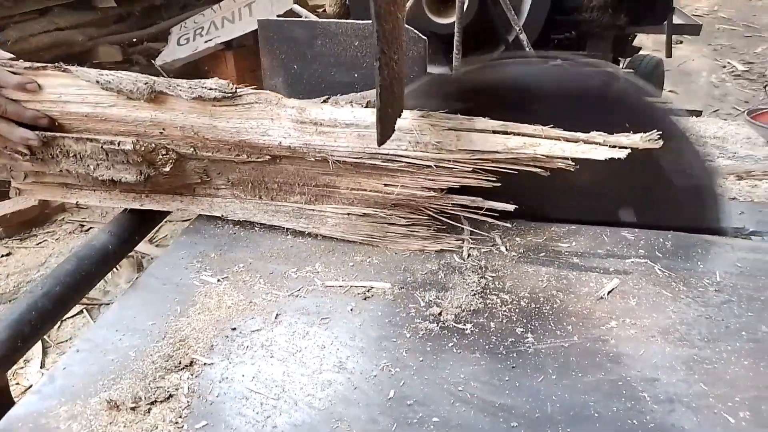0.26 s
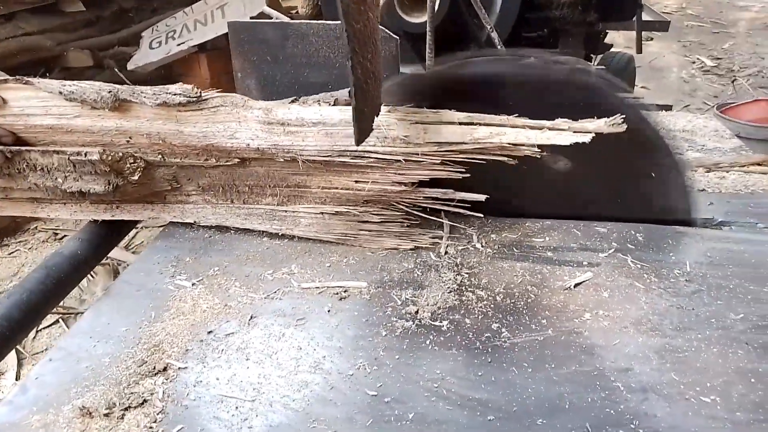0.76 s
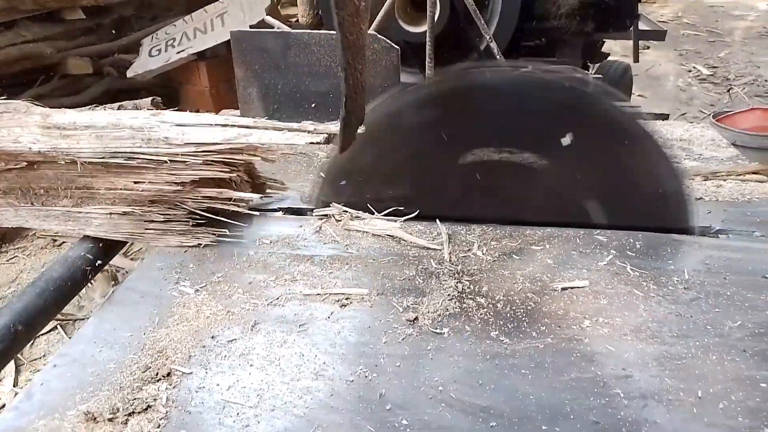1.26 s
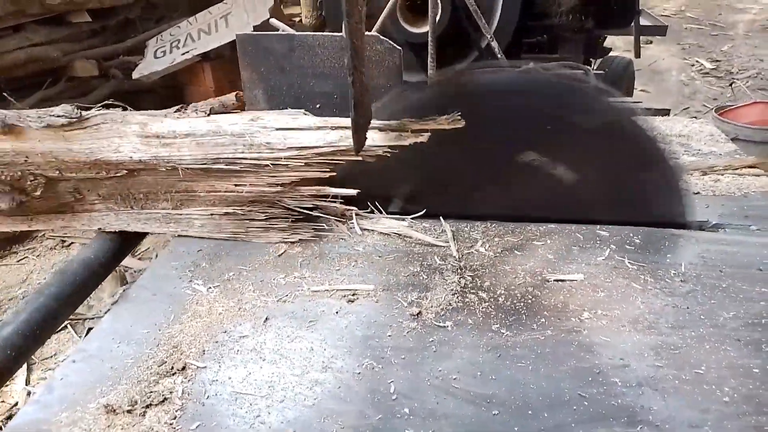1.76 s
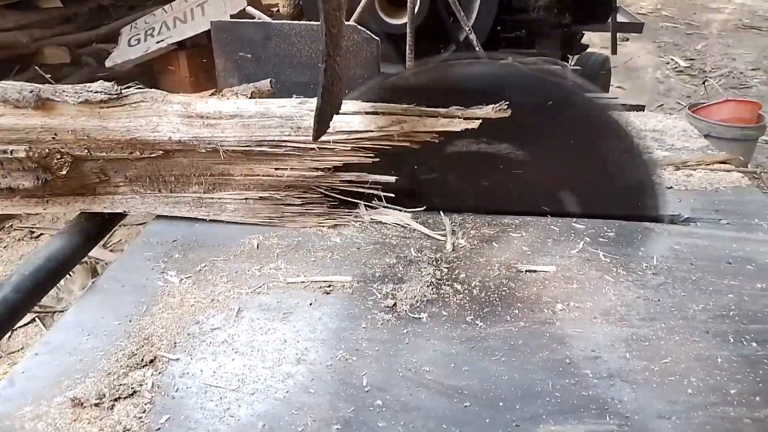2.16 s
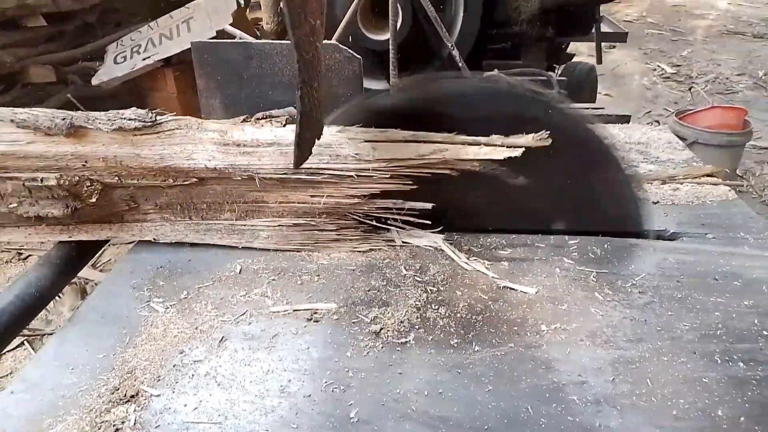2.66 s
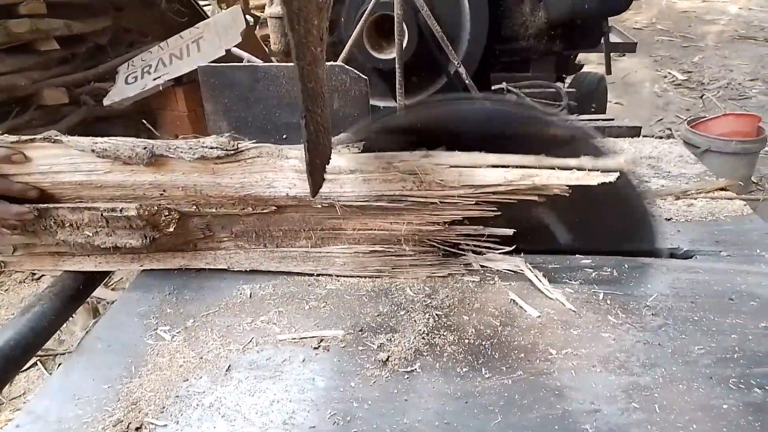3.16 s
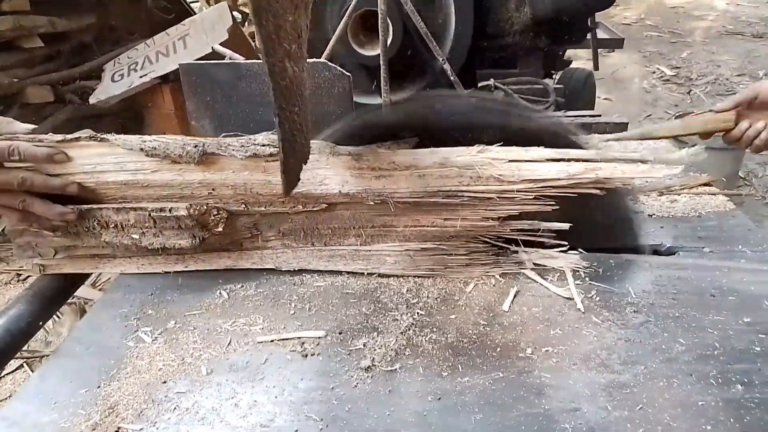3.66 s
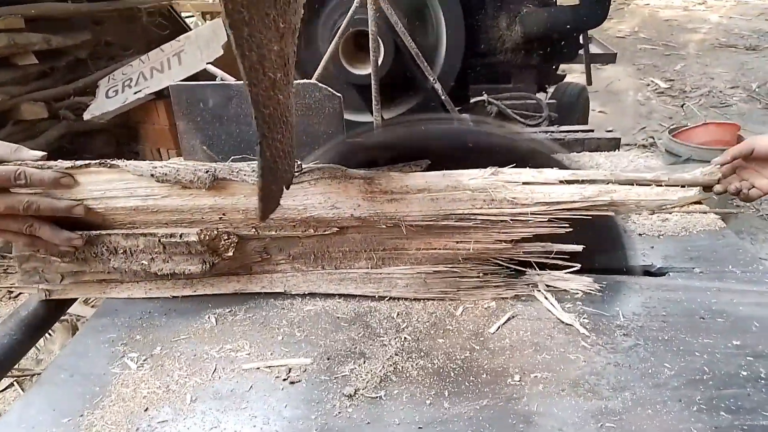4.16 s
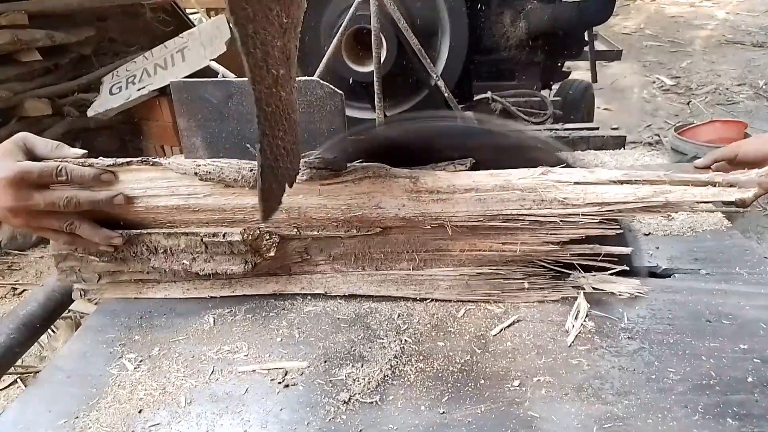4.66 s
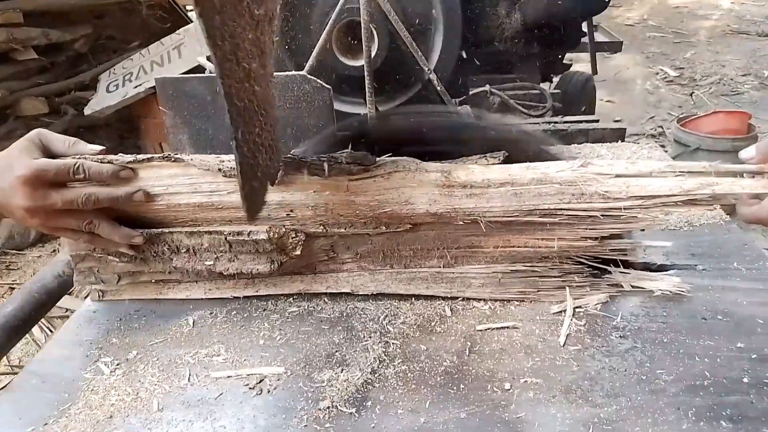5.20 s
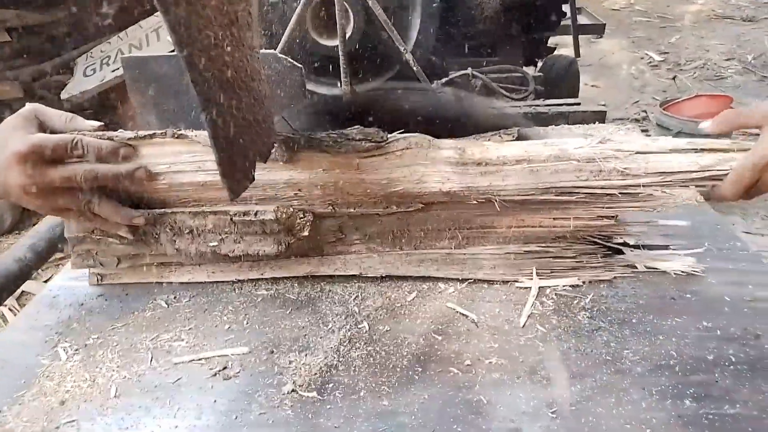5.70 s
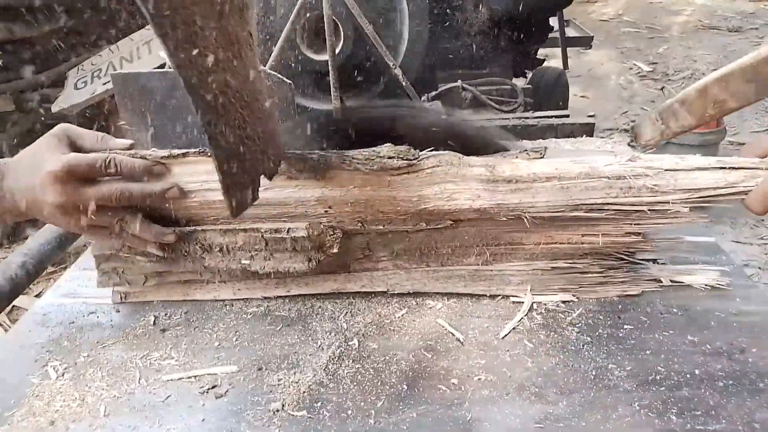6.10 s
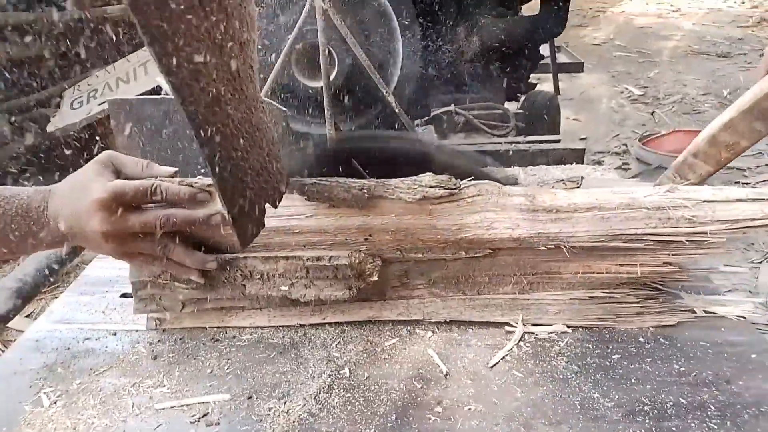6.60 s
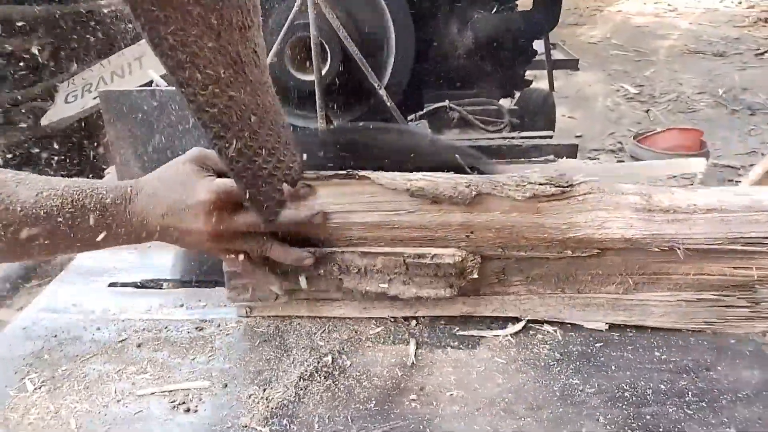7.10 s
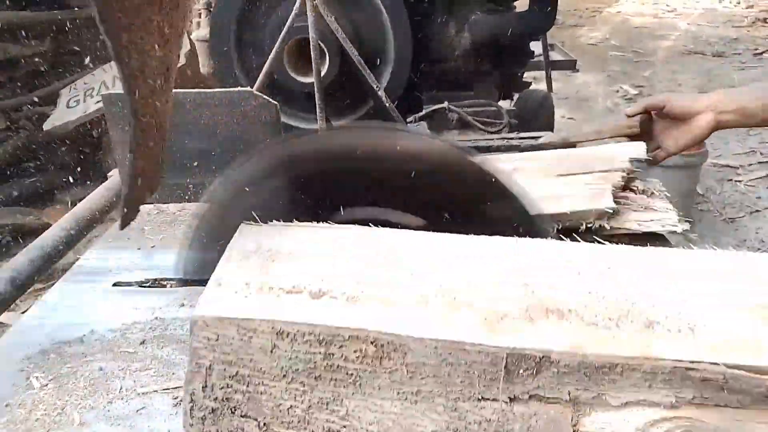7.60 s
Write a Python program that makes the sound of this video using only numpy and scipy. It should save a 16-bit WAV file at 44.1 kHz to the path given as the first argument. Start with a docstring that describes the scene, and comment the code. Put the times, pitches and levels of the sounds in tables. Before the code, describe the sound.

Outdoors and close up, a big circular saw is already biting a log with harsh hiss and whine. The log is drawn back, the blade rings over a fast thumping, clattering one-cylinder engine, then a five-second cut roars with sagging, shifting whine. It comes clear with faint ringing before the teeth bite again. Dry, loud and slightly overloaded stereo pickup.

```python
"""Outdoors, a one-cylinder engine drives a large circular saw that is already biting a log: teeth hiss and whine.
At about 0.6 s the log is drawn back, and the blade rings on over the engine's thump and clatter, once a cycle.
From 1.3 s the log is fed in again for a five-second cut: noise pulsed by the teeth, whine on the tooth rate.
It comes clear at about 6.5 s with brief tones and fainter ringing, then the teeth bite again from 7.5 s to the end.
The frame rattles and roars throughout, and a gain control pulls the engine down when the teeth bite loudly."""
import sys
import numpy as np
from scipy import signal
from scipy.fft import rfft, irfft, next_fast_len
from scipy.io import wavfile
from scipy.ndimage import uniform_filter1d

SR = 44100
rng = np.random.default_rng(int(sys.argv[2]) if len(sys.argv) > 2 else 0)


def generate_wav(sig):
    """Save sig (samples, or channels by samples) to the path in sys.argv[1] as 16-bit PCM at SR."""
    pcm = np.round(np.clip(np.atleast_2d(sig).T, -1, 1) * 32767).astype(np.int16)
    wavfile.write(sys.argv[1], SR, pcm)


N = 346185
GRIP_DB = -2.5  # wood on the teeth damps the steel
BITE_S, CLEAR_S = 0.052, 0.11  # time for the teeth to bite in and to come clear


def gain_of(db):
    """Decibels to gain."""
    return 10 ** (np.asarray(db) / 20)


def evened(x):
    """Scales to rms 1."""
    return x / np.sqrt(np.mean(x ** 2) + 1e-20)


def read(points, hz):
    """Spectrum columns at hz, joined on a log frequency axis."""
    point_hz, *columns = np.transpose(points)
    return np.array([np.interp(np.log(hz + 1), np.log(point_hz + 1), column) for column in columns])


def curves(rows):
    """Each column of a time table at every sample."""
    time_s, *columns = np.transpose(rows)
    return [np.interp(np.arange(N) / SR, time_s, column) for column in columns]


def wander(rate_hz):
    """Slow chance of rms 1: low-passed noise drawn at a thirty-second of the sample rate."""
    b, a = signal.butter(2, rate_hz, fs=SR / 32)
    count = N // 32 + 2
    slow = signal.lfilter(b, a, rng.standard_normal(count))
    return evened(np.interp(np.arange(N) / 32, np.arange(count), slow))


# how alike the noise is on the two sides: freq_hz [Hz], likeness [0-1]
LIKENESS = [(60, 1), (280, 0.637), (620, 0.41), (1350, 0.087), (2950, 0), (14000, 0)]


def noise(spectrum, patchy_db):
    """Two-channel noise of a given colour whose time-frequency patches drift in level."""
    hz = np.fft.rfftfreq(512, 1 / SR)
    a, b, c, d, patches = rng.standard_normal((N // 128 + 5, 257, 5)).T
    patches = uniform_filter1d(patches, size=6, axis=0)  # across frequency
    patches = evened(uniform_filter1d(patches, size=20, axis=1))  # across time
    same = np.clip(read(LIKENESS, hz).T, -1, 1)
    left = a + 1j * b
    right = same * left + np.sqrt(1 - same ** 2) * (c + 1j * d)
    bins = np.array([left, right]) * gain_of(read(spectrum, hz).T + patchy_db * patches)
    return evened(signal.istft(bins, nperseg=512, noverlap=384)[1][:, :N])


def whistle(hz, width_hz, steady=0.):
    """Noise through two equal narrow resonances at a moving pitch, with a steady core if asked; rms 1."""
    r = np.exp(-np.pi * width_hz / SR)
    slow = rng.standard_normal(N) + 1j * rng.standard_normal(N)
    for _ in range(2):
        slow = signal.lfilter([1 - r], [1, -r], slow)
    slow = steady + slow / np.std(slow)
    carrier = np.exp(2j * np.pi * np.cumsum(hz * np.ones(N)) / SR)
    return evened((slow * carrier).real)


def swell(start_s, end_s, level_db):
    """A rounded rise and fall of gain."""
    along = np.clip((np.arange(N) / SR - start_s) / (end_s - start_s), 0, 1)
    return gain_of(level_db) * np.sqrt(np.sin(np.pi * along).clip(0))


# the log against the teeth: bite_s [s], clear_s when they begin to come clear [s]
CUTS = [(-1, .55), (1.318, 6.43), (7.48, 8.2)]


def contact(rise_s):
    """0-1: how far the teeth are in the wood, reached over rise_s and left over CLEAR_S."""
    t = np.arange(N) / SR
    total = np.zeros(N)
    for bite_s, clear_s in CUTS:
        total += np.clip(np.minimum((t - bite_s) / rise_s, 1 - (t - clear_s) / CLEAR_S), 0, 1)
    return total


# engine speed: time_s [s], speed [cycles a second]
ENGINE_SPEED = [(0, 12.75), (.25, 12.61), (.45, 12.97), (.7, 13.23), (1, 13.665), (1.4, 13.79),
                (1.8, 13.515), (2.2, 13.27), (2.7, 12.95), (3.2, 12.807), (3.5, 13.104), (3.8, 13.263),
                (4.3, 13.141), (4.9, 13.031), (5.5, 12.913), (5.9, 12.88), (6.2, 12.862), (6.55, 13.301),
                (6.9, 13.768), (7.2, 13.81), (7.5, 13.847), (7.85, 13.675)]


def crank():
    """Engine cycles gone by at every sample: the running sum of the speed."""
    start_turn = -.09  # cycles
    return start_turn + np.cumsum(curves(ENGINE_SPEED)[0]) / SR


def once_a_cycle(turns, place, spread_db, jitter):
    """One click each time the crank passes a place, uneven in size and, by jitter in cycles, in time."""
    chance = rng.standard_normal((120, 2))
    cycle = np.arange(120) - 1 + place
    # passes outside the scene land on the spare last sample, which is dropped
    at = np.interp(cycle + jitter * chance[:, 0], turns, np.arange(N), left=N, right=N).astype(int)
    clicks = np.zeros(N + 1)
    clicks[at] = gain_of(spread_db * chance[:, 1])
    return clicks[:N]


def ring(hz, t60_s):
    """A decaying mode whose drive builds softly over about one of its cycles."""
    t = np.arange(4000) / SR
    build = (1 - np.exp(-t * hz * .9)) ** 2
    return 2.6 * gain_of(-60 * t / t60_s) * build * np.sin(2 * np.pi * hz * t)


# tooth passing rate, sagging under load, before a slight wander: time_s [s], rate_hz [Hz]
TOOTH_RATE = [(0, 925), (.45, 941), (1.36, 1018), (1.62, 988), (2, 949), (2.45, 928), (2.95, 872.3),
              (3.5, 952), (4.9, 917), (5.1, 887), (5.25, 869.3), (5.75, 876), (6, 905.6), (6.5, 948),
              (7.85, 940)]
# how hard the log is pushed, as the level of the tearing: time_s [s], level_db [dB]
PUSH = [(.2, -9), (.5, -9.5), (1.45, -6.5), (2.1, -3), (2.6, -4.5), (3, -4), (3.25, -5.5), (3.5, -8.5),
        (3.8, -4.5), (4.8, -7.5), (5.05, -6.5), (5.3, -4), (5.55, -6.5), (6.4, -8), (7.55, -6.5),
        (7.85, -3.5)]
# brief shifts in the tearing, mostly dips as the teeth lose their grip: time_s [s], change_db [dB]
SLIPS = [(0, -3.5), (.065, -8.5), (.15, -7.5), (4.13, 1), (4.38, 0.5), (5.65, -0.5), (5.9, -2.5)]
# colour of the tearing: freq_hz [Hz], density_db [dB per Hz, relative]
HISS = [(400, -51), (1500, -14.5), (2500, -4), (4000, -2), (9000, 4.5), (14500, 0)]
# steady whine while cutting, before flutter: multiple of the tooth rate -> level_db [dB]
WHINE_DB = {"1st": -36.5, "2nd": -38, "7th": -40}
# swells of the whine, before flutter: multiple of the tooth rate, start_s [s], end_s [s], level_db [dB]
SWELLS = [("1st", .05, 0.72, -28.5), ("1st", 1.34, 1.78, -18), ("1st", 1.68, 2.13, -18.5),
          ("1st", 2.1, 2.58, -27), ("1st", 2.77, 5.3, -29), ("1st", 5, 5.66, -28.5),
          ("1st", 5.8, 6.47, -29.5), ("2nd", 2.16, 2.74, -20), ("2nd", 2.76, 3.8, -23.5),
          ("2nd", 4.75, 5.08, -25.5), ("2nd", 5.14, 5.6, -27), ("7th", 1.4, 2.6, -39),
          ("7th", 3.14, 4.06, -23.5), ("7th", 4.9, 5.35, -19.5), ("7th", 4.98, 6.47, -27)]
# engine effort: time_s [s], running_free [0-1], knock_db strength [dB]
EFFORT = [(0, 0, 7.5), (.55, 0.1, 8), (1.35, 0.73, 0.5), (2, 0, 7), (4, .05, 0), (6.55, 0.03, 1.5),
          (6.75, 1, 5.5), (7.5, .9, -6), (7.85, 0, -2)]


def cutting():
    """Each tooth tears a chip of its own size: noise pulsed at the tooth rate, with a whine on its multiples."""
    slip_width_s, idle_hiss_db, spun_up_hiss_db = 0.023, -31, -27
    t = np.arange(N) / SR
    rate_hz = curves(TOOTH_RATE)[0] * (1 + .003 * wander(7.94))
    cut = contact(BITE_S)
    tear_db = curves(PUSH)[0]
    for time_s, change_db in SLIPS:
        tear_db = tear_db + change_db * np.exp(-((t - time_s) / slip_width_s) ** 2)

    passed = np.cumsum(rate_hz) / SR  # teeth gone by
    chip_db = .9 * rng.standard_normal(9000)[passed.astype(int)]
    bite = gain_of(chip_db + 1.0 * wander(5.4)) * (1 + 0.0667 * np.cos(2 * np.pi * passed))
    idle_db = idle_hiss_db + curves(EFFORT)[0] * (spun_up_hiss_db - idle_hiss_db)
    hiss = gain_of(idle_db + cut * (tear_db - idle_db)) * evened(bite * noise(HISS, 1.72))

    flutter = evened(gain_of(2.3 * wander(45)))  # the blade wobbles, so the whine comes and goes
    level = {name: cut * gain_of(db) for name, db in WHINE_DB.items()}
    for name, *row in SWELLS:
        level[name] = np.hypot(level[name], swell(*row))
    whine = level["1st"] * whistle(rate_hz, 30., 2.2)
    whine += level["2nd"] * whistle(2 * rate_hz, 110., .5)
    whine += level["7th"] * whistle(7 * rate_hz, 260.)
    return hiss + flutter * whine


# blade modes: pitch_hz [Hz], width_hz of each resonance [Hz], level_db [dB, relative]
BLADE = [(558, 106, -6), (676, 35, -9), (729, 90, -5.5), (855, 49, -17), (958, 26, -5)]
# blade set ringing as the wood lets go: peak_s [s], level_db before grip [dB], fade [dB a second]
RINGING = [(.5, -22.5, 3.5), (6.58, -31, 11)]
# the log hums while it slides: start_s [s], end_s [s], level_db before grip [dB]
HUMS = [(-.4, 0.686, -22.5), (1.38, 2.1, -29), (1.992, 3.45, -24.5), (4.0, 5.1, -34)]
# brief tones, squeals and broad bursts from blade and wood: start_s, end_s [s], pitch_hz, width_hz [Hz],
# level_db before grip [dB]
BRIEF_TONES = [(0.087, 0.42, 1470, 77, -24), (.28, 0.38, 1090, 40, -16.5), (0.34, 0.74, 2250, 750, -21.5),
               (0.4, 0.86, 2130, 49, -33), (1.7, 2.34, 836, 40, -21), (6.44, 6.58, 1110, 270, -23.5),
               (5.6, 6.54, 1350, 430, -21.5), (6.2, 7.55, 1450, 210, -29), (6.65, 7.9, 525, 120, -29.5),
               (6.9, 7.6, 1850, 160, -23.5)]


def blade_and_log():
    """Fixed blade modes ring as wood lets go, brief tones and squeals swell and fade, and the sliding log hums."""
    t = np.arange(N) / SR
    ringing = np.zeros(N)
    for peak_s, level_db, fade in RINGING:
        after = t - peak_s
        ringing += gain_of(level_db + np.minimum(50 * after, -fade * after))  # rises 50 dB a second
    out = ringing * sum(gain_of(db) * whistle(hz, width, 0.68) for hz, width, db in BLADE)
    log_hz = 392.4 * (1 + 0.01285 * wander(1.35))
    out += sum(swell(*row) for row in HUMS) * whistle(log_hz, 42, 0.75)
    for start_s, end_s, hz, width_hz, level_db in BRIEF_TONES:
        out += swell(start_s, end_s, level_db) * whistle(hz, width_hz, 0.45)
    return out * gain_of(GRIP_DB * contact(BITE_S))


# exhaust and intake blows in one cycle: place [0-1], pitch_hz [Hz], t60_s [s],
# load_db under load, free_db running free [dB, relative]
BLOWS = [(0.359, 122.5, 0.048, -22.5, -21.5), (0.381, 245, 0.031, -11.5, -15.5),
         (0.688, 265, 0.025, -12, -6), (0.951, 262, 0.038, -20, -19)]
# metal knocks in one cycle: place [0-1], pitch_hz [Hz], t60_s [s], level_db before knock strength [dB]
KNOCKS = [(0.198, 690, 0.017, -13), (.2, 930, 0.0091, -17.5), (0.199, 514, 0.019, -16),
          (0.302, 598, 0.02, -24), (0.451, 745, 0.0161, -22.5), (.72, 550, 0.012, -16.5)]
# valve gear clacks in one cycle: place [0-1], load_db under load [dB, relative], t60_s [s],
# free_db running free [dB, relative]
CLACKS = [(0.165, -7.5, 0.03, -10), (.24, -17, 0.03, -12.5), (0.42, -7.5, 0.056, -15),
          (.58, -20.5, 0.047, -14), (.67, -31, 0.039, -13), (.94, -17, 0.027, -18)]
# colour of the clacks: freq_hz [Hz], density_db [dB per Hz, relative]
CLANK = [(500, -1.5), (2000, 6.5), (4000, 2), (5300, -0.5), (7500, 7), (11000, 6), (13000, 2.5),
         (14500, -49)]


def engine():
    """Blows ring low modes, knocks ring the block, clacks gate a metallic noise, one gear order sings."""
    clack_free_db, clack_cut_db = -0.96, -3.5  # added to every clack
    gear_order, gear_db = 23, -42.5  # whine cycles per engine cycle, and its middle level
    turns, t = crank(), np.arange(4000) / SR
    free, knock_db = curves(EFFORT)
    clack_db = clack_free_db + contact(BITE_S) * (clack_cut_db - clack_free_db)
    thump, gate = np.zeros(N), np.zeros(N)
    for place, hz, t60_s, load_db, free_db in BLOWS:
        blows = gain_of(load_db + free * (free_db - load_db)) * once_a_cycle(turns, place, 1.1, .0015)
        thump += signal.oaconvolve(blows, ring(hz, t60_s))[:N]
    for place, hz, t60_s, level_db in KNOCKS:
        knocks = gain_of(level_db + knock_db) * once_a_cycle(turns, place, 1.5, .002)
        thump += signal.oaconvolve(knocks, ring(hz, t60_s))[:N]
    for place, load_db, t60_s, free_db in CLACKS:
        puff = gain_of(-60 * t / t60_s) * (1 - np.exp(-t / 0.0014))
        level_db = clack_db + load_db + free * (free_db - load_db)
        clacks = gain_of(level_db) * once_a_cycle(turns, place, 2.2, .004)
        gate += signal.oaconvolve(clacks, puff)[:N]
    gear_gain = gain_of(gear_db + 2.14 * wander(5.9)) * np.sqrt(2)
    gear = gear_gain * np.sin(2 * np.pi * gear_order * turns)
    return thump + gear + gate * noise(CLANK, 1.1)


# colour of the shaken steel table: freq_hz [Hz], density_db [dB per Hz, relative]
RATTLE = [(20, -60), (40, -42), (80, -15), (120, -11), (165, -19), (200, -21.5), (260, -7), (400, 0.5),
          (600, -1.5), (850, -1), (1200, -2), (2500, -26)]
# colour of the blade and belt whirr: freq_hz [Hz], density_db [dB per Hz, relative]
ROAR = [(300, -57), (700, -13.5), (1100, -1), (1500, 1.5), (1830, 3), (2150, -3.5), (3000, -16),
        (5000, -16.5), (14000, -39)]


def frame():
    """The steel table rattles and blade and belt whirr: two noises that swell with the push and each firing."""
    cut = contact(0.5)  # the log shakes the frame fully once the blade has sunk in, after 0.5 s
    push_db = curves(PUSH)[0]

    def driven_db(idle_db, cut_db, share):
        """Level from idle to cutting, with a share of the push passed on."""
        return idle_db + cut * (cut_db + share * push_db - idle_db)

    since_firing = (crank() - .17) % 1  # in cycles
    jolt_db = 3.5 * np.exp(-since_firing / 0.19)
    shake_db = GRIP_DB * contact(BITE_S) + 0.78 * wander(31) + jolt_db
    rattle = gain_of(driven_db(-25.5, -16, 0.51) + shake_db) * noise(RATTLE, 0.67)
    whirr = gain_of(driven_db(-22, -12, 0.69) + shake_db) * noise(ROAR, 1.75)
    return rattle + whirr


def scene():
    """All sources summed, in the open air with no reverberation."""
    return cutting() + blade_and_log() + engine() + frame()


def roll_off(x):
    """The treble ends steeply here."""
    return signal.sosfilt(signal.butter(12, 14350, fs=SR, output="sos"), x)


# the two microphone ports, each with resonances of its own: freq_hz [Hz], left_db [dB], right_db [dB]
PORTS = [(25, -27, -22), (69.5, -7.5, -5.5), (123, -3.5, -4), (165, -12, -6), (238, -3, -1),
         (1930, -1.5, 1), (2630, 0, -1), (3500, 3, 3.5), (4740, 6.5, -1.5), (5170, -4, 3), (5820, 4.5, 0),
         (7485, 14, -0.5), (8320, 4, -1.5), (8680, 3.5, -0.5), (9640, -9.5, 4), (11010, 5.5, 10),
         (12300, -13.5, 2.5), (13750, -1, 2), (15340, -21, -20)]


def record(dry):
    """Ports colour each side, a gain control drops quickly and recovers more slowly, and overload clips."""
    size = next_fast_len(N)
    port_gain = gain_of(read(PORTS, np.fft.rfftfreq(size, 1 / SR)))
    heard = irfft(rfft(dry, size) * port_gain, size)[:, :N]
    power = uniform_filter1d((heard ** 2).mean(0), size=1500)
    power_db = 10 * np.log10(abs(power) + 1e-12)
    fall_db = np.arange(N) * 60. / SR  # the held level falls by at most 60 dB a second
    held_db = np.maximum.accumulate(power_db + fall_db) - fall_db
    over_db = np.maximum(held_db + 12.5, 0)  # threshold -12.5 dB
    levelled = heard / gain_of(0.74 * uniform_filter1d(over_db, size=600))
    return roll_off(np.clip(levelled, -.82, .82))


dry = scene()
out = record(dry)
generate_wav(out)
```